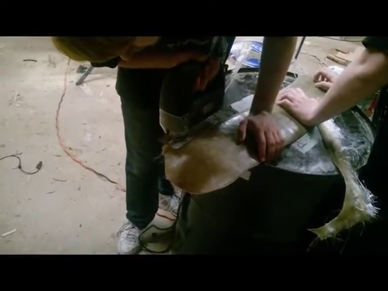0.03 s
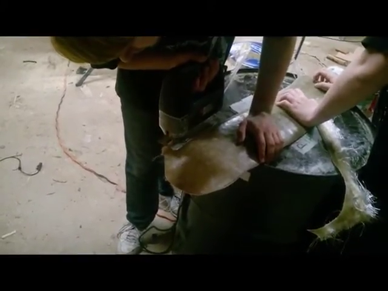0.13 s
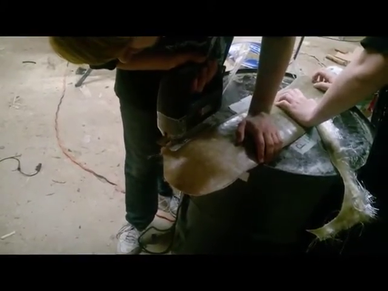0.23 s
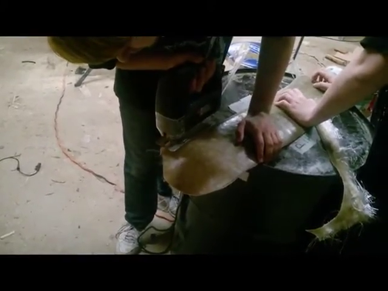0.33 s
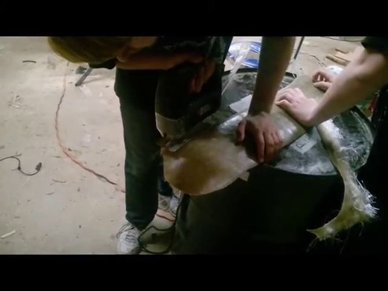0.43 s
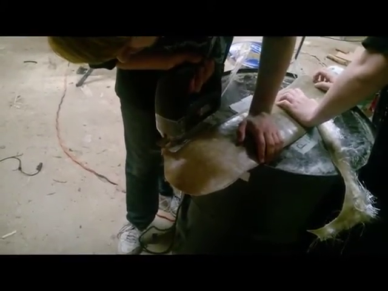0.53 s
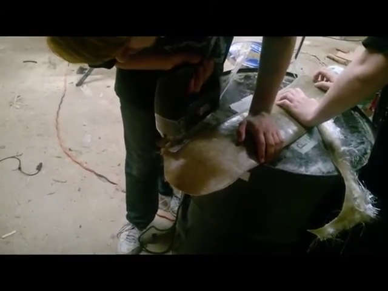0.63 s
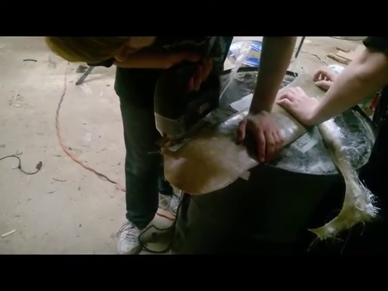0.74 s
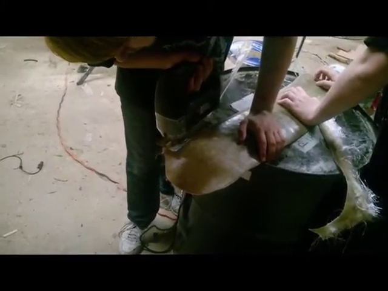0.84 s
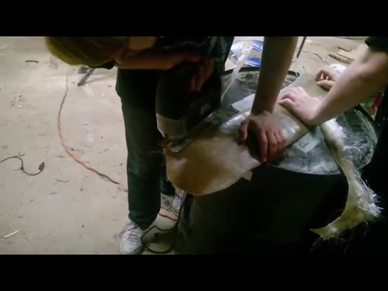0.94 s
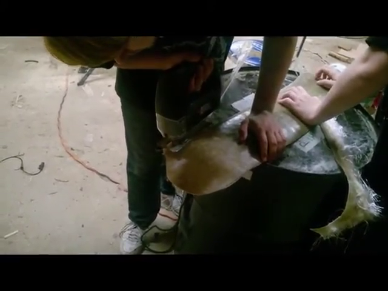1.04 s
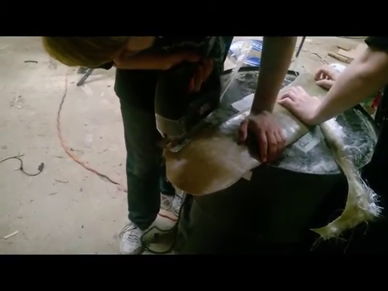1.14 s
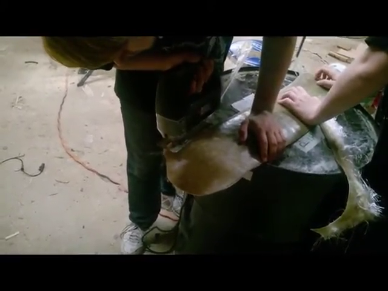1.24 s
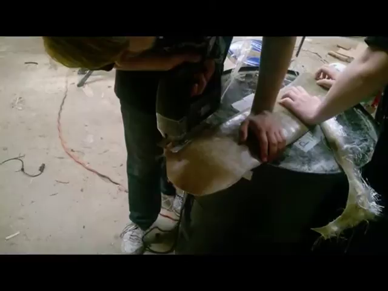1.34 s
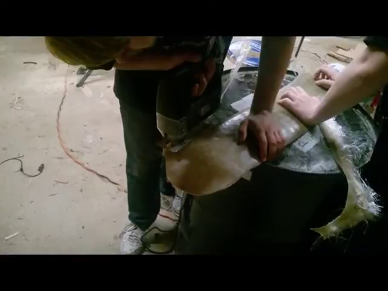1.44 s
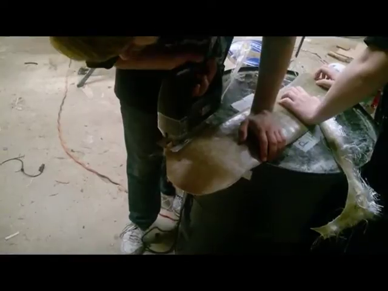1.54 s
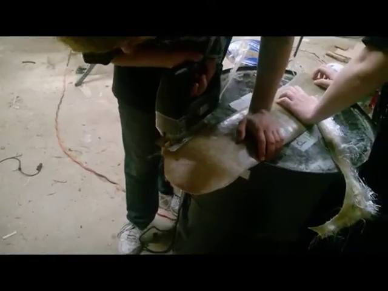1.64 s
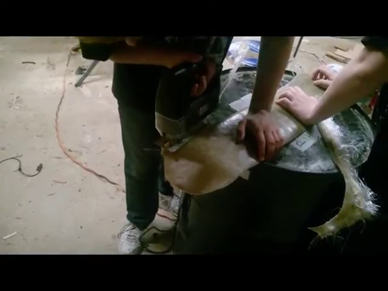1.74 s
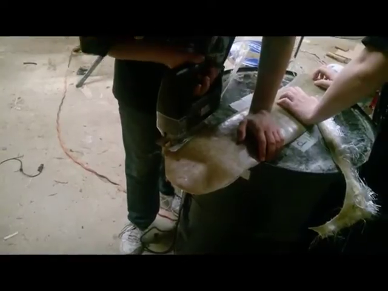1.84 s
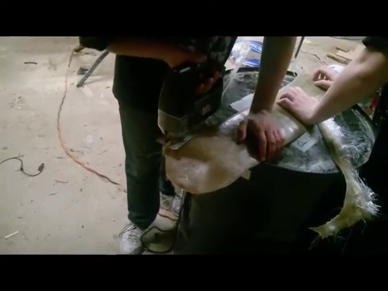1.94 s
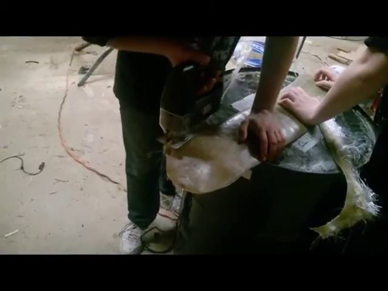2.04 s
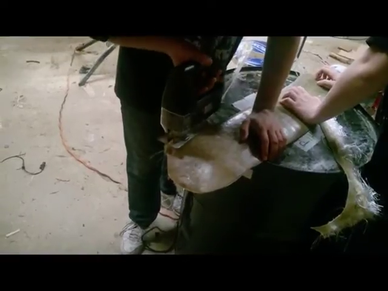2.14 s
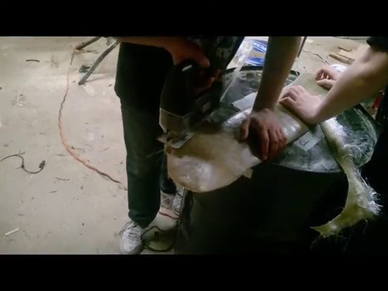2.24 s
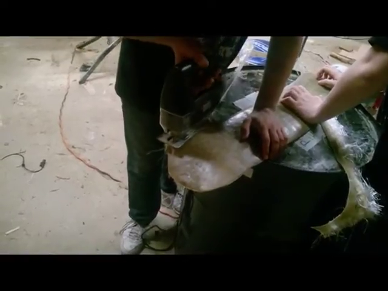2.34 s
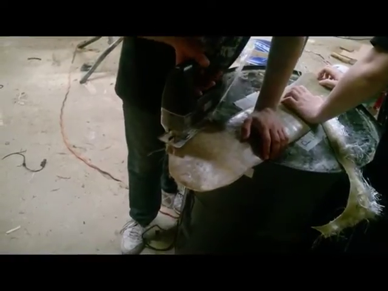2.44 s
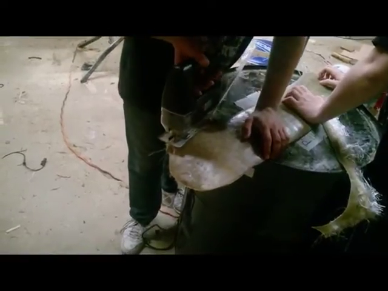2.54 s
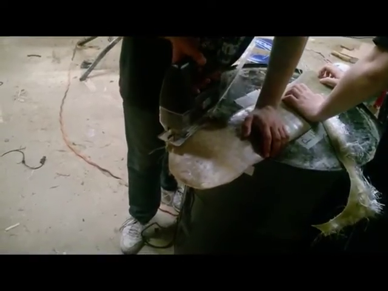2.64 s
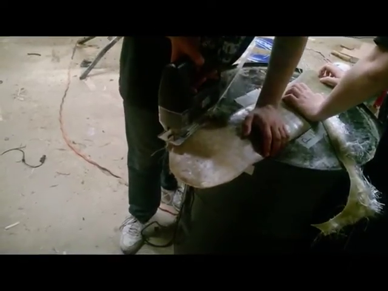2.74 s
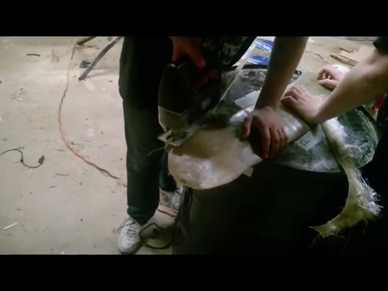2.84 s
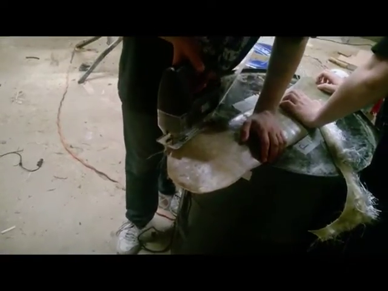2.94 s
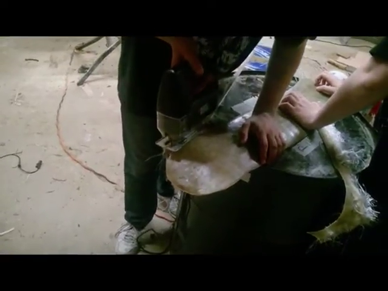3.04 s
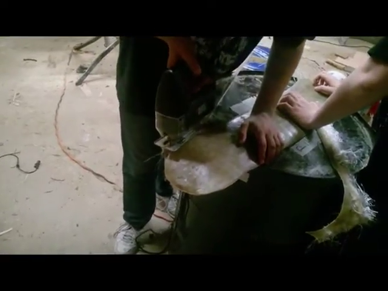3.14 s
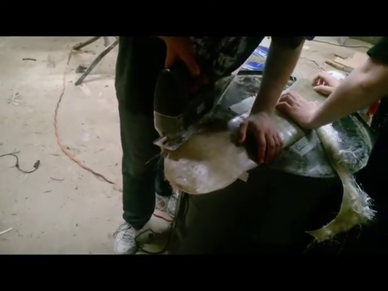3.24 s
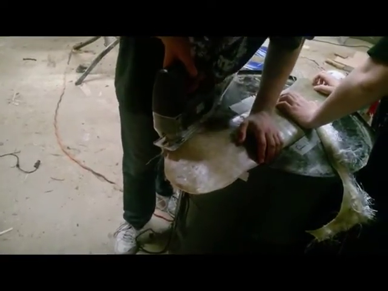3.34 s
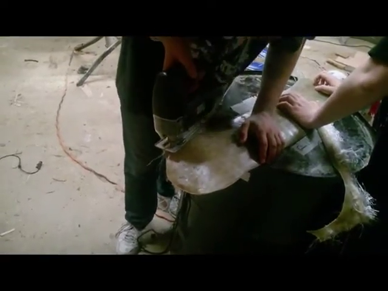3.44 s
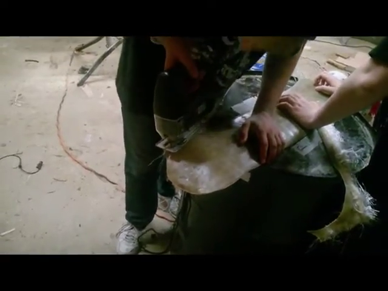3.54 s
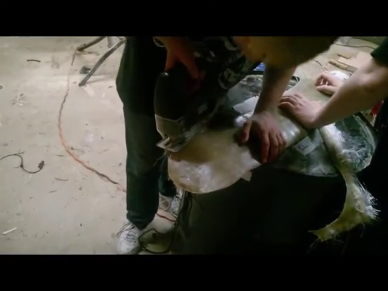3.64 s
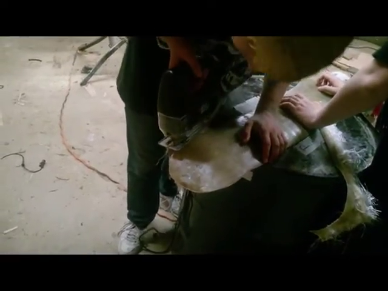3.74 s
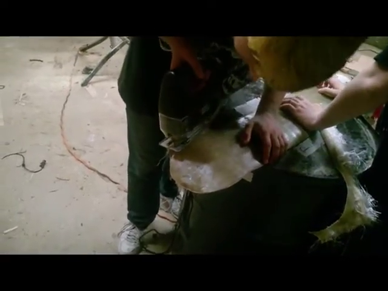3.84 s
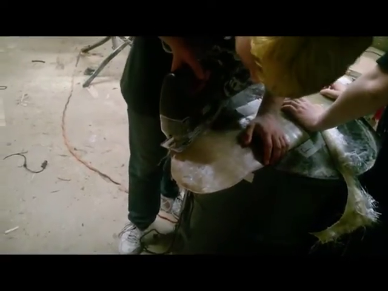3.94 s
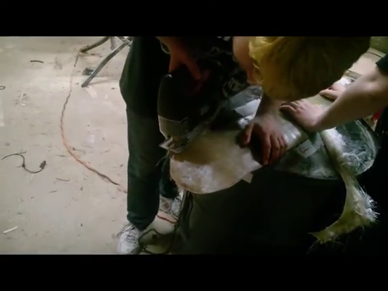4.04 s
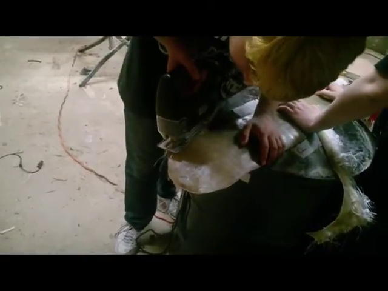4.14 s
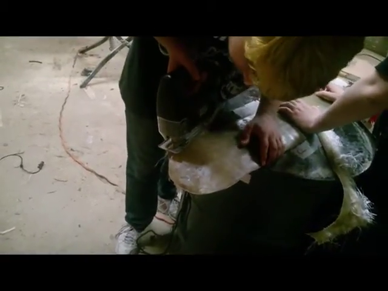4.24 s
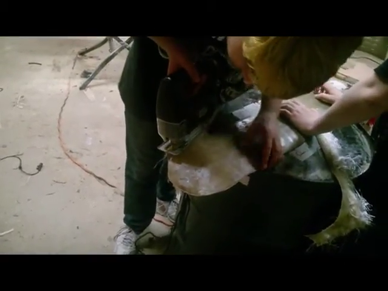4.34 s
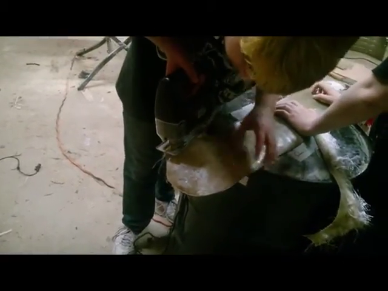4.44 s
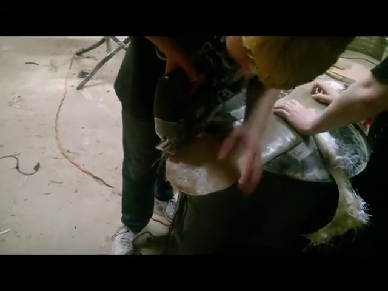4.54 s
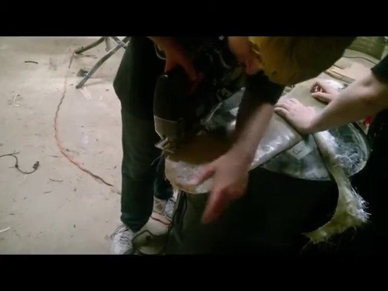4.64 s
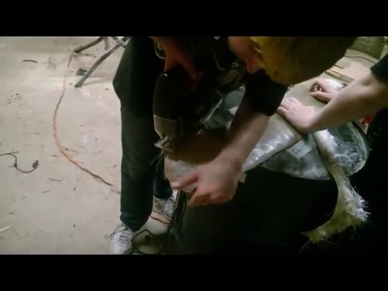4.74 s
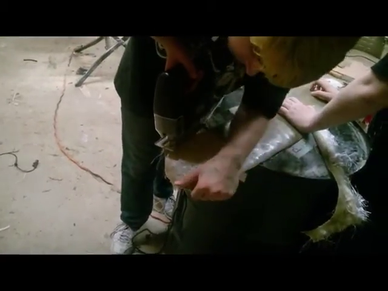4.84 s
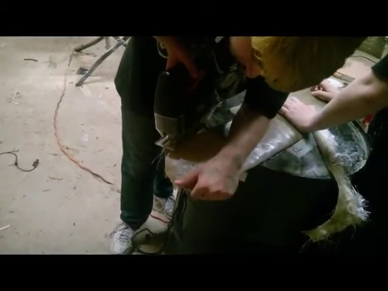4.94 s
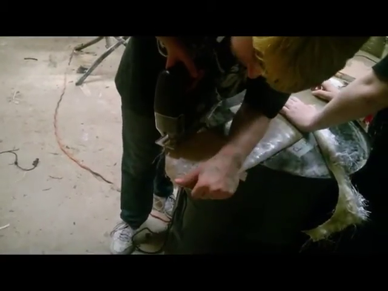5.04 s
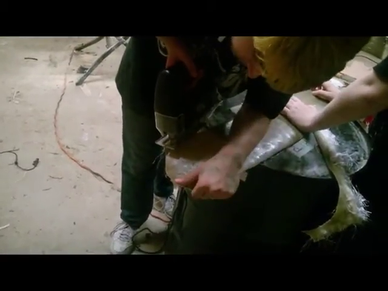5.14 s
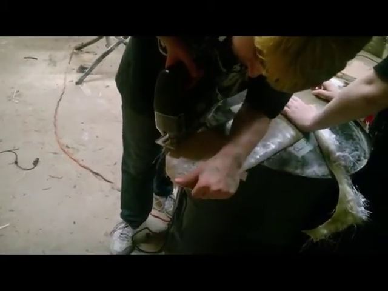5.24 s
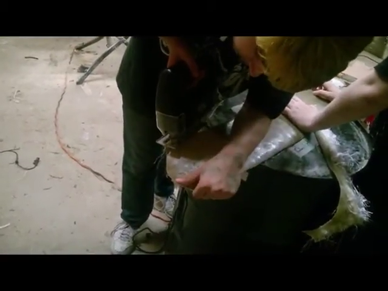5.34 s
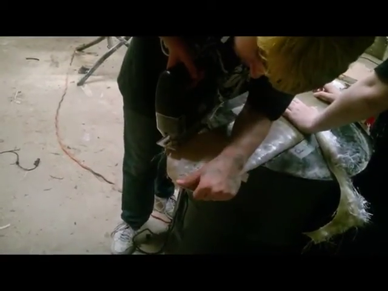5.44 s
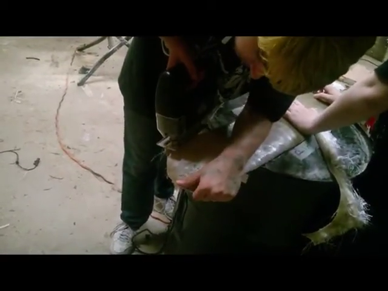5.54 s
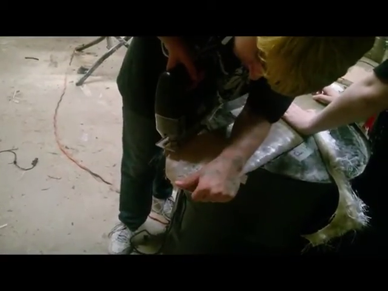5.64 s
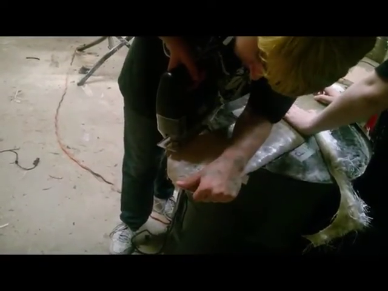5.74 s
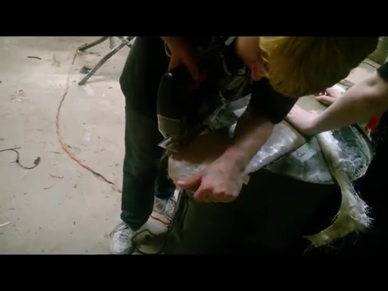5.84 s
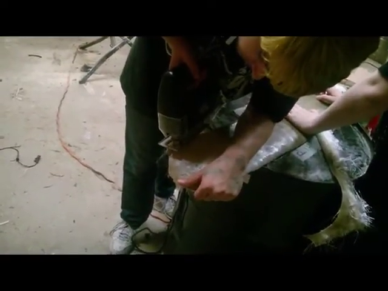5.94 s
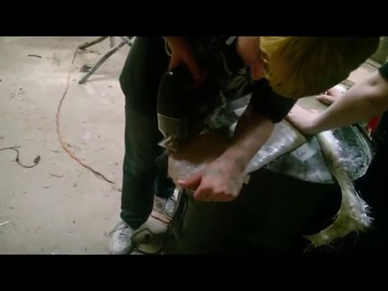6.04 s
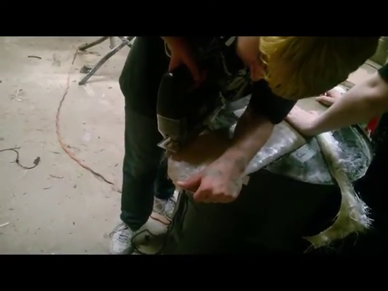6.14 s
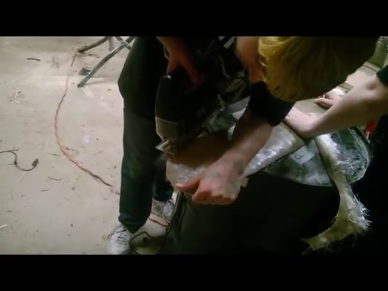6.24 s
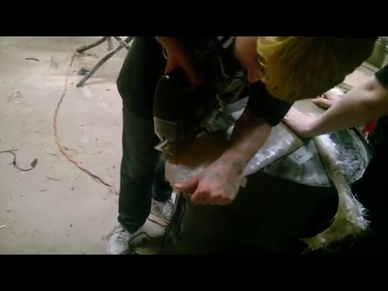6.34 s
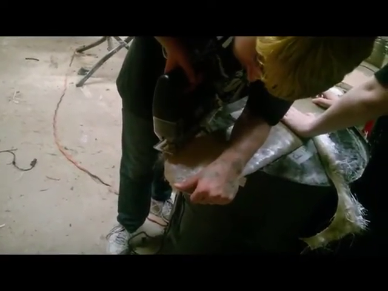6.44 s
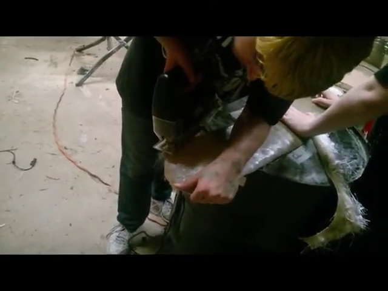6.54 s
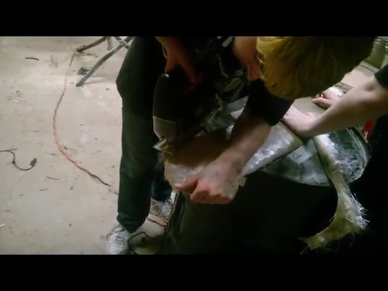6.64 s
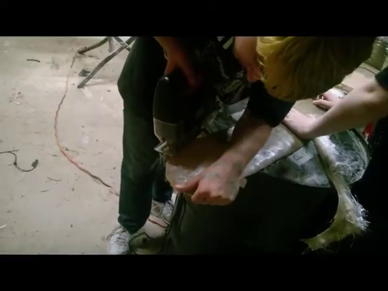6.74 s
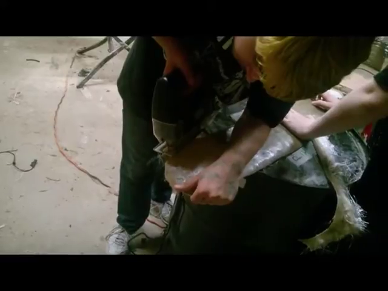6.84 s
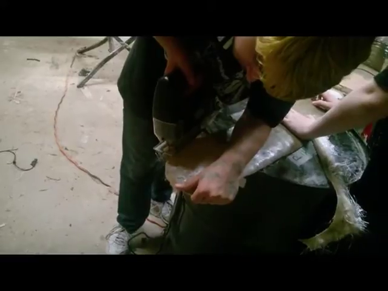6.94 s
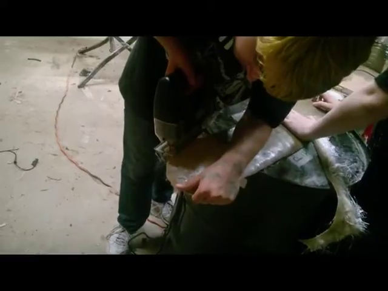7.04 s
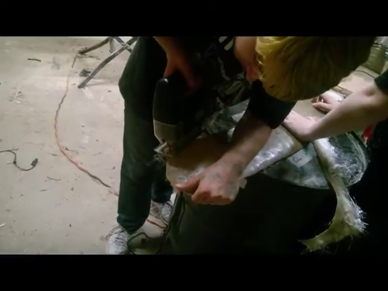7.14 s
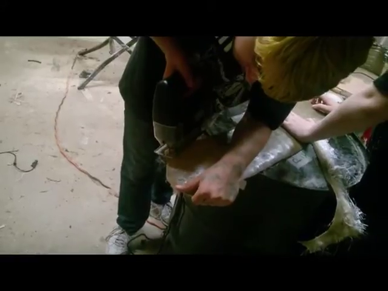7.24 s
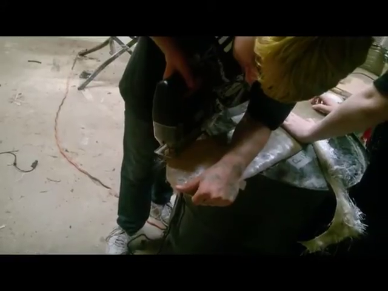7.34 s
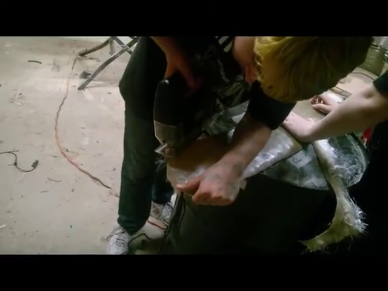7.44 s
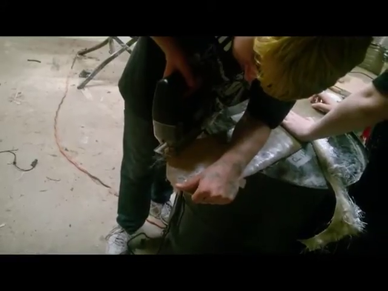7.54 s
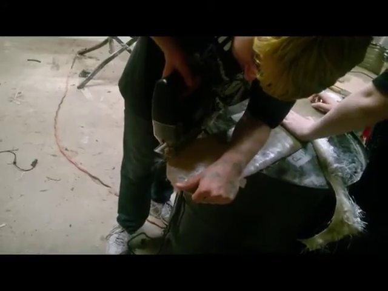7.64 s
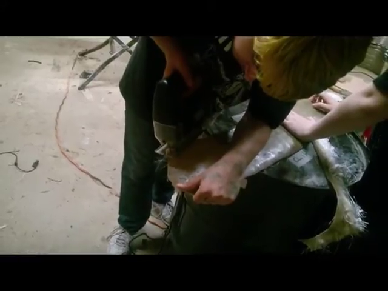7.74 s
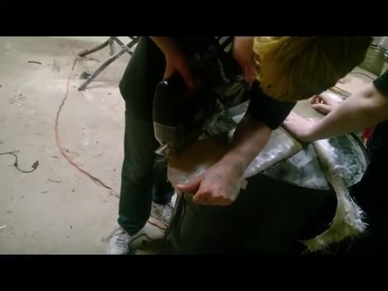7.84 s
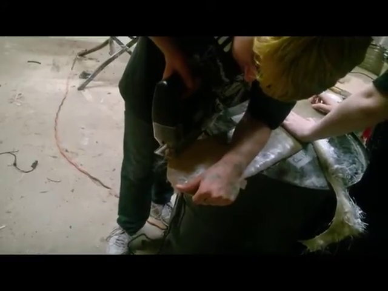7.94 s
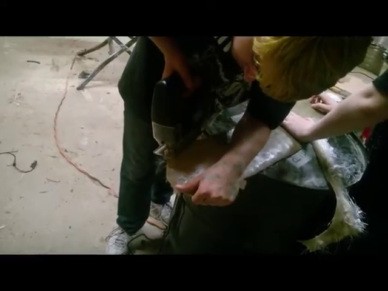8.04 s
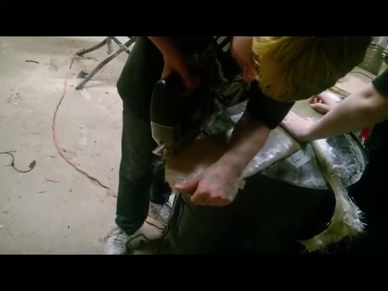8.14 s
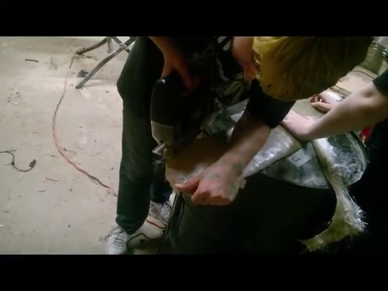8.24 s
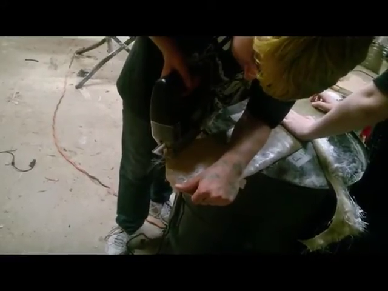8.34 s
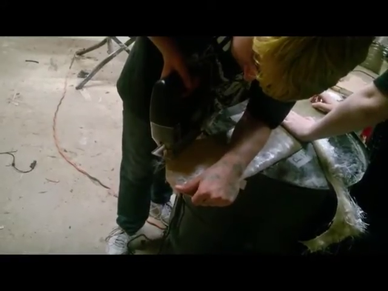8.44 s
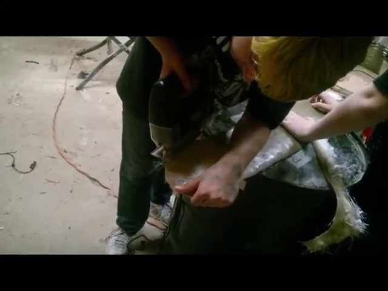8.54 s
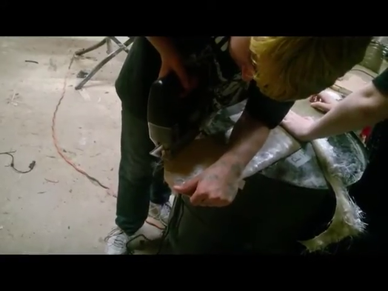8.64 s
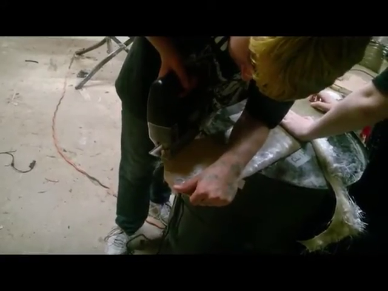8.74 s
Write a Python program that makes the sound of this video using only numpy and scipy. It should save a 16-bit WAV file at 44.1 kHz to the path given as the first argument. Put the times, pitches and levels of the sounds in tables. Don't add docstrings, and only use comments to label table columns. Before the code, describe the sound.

From 0 s a jigsaw is already cutting fibreglass at full speed, close to the microphone: a dense rasping buzz of about fifty-four strokes a second, with ringing board tones, bright motor hiss and low shaking. At about 1.3 s power goes off. The pitch sinks, gear whine glides down, and the buzz separates into hard, rattling knocks, ever slower and weaker through 3.5 s, dragging to a faint low groan and halt near 4.1 s. In the quiet shop a hand scuffs the board at 4.3 s and shifts grip around 4.7 s; something stirs dully at 4.9 s. Faint trigger ticks lead to a click at 5.2 s. The motor spins up quickly, teeth bite with a sharp crack near 5.36 s, and by 6 s the full rasp is back, differently ringing, swelling and easing, with low board thumps around 6.1-6.6 and 7.5 s. It continues cutting to the end, about 8.9 s.

```python
import sys
import numpy as np
from scipy import signal
from scipy.fft import rfft, irfft
from scipy.io import wavfile
from scipy.ndimage import uniform_filter1d

SR = 44100
rng = np.random.default_rng(int(sys.argv[2]) if len(sys.argv) > 2 else 0)


def put_to_file(sound):
    columns = np.atleast_2d(sound).T
    safe = np.clip(columns, -1, 1)
    whole_steps = np.round(safe * 32767)
    wavfile.write(sys.argv[1], SR, whole_steps.astype(np.int16))


def ratio_of_db(decibels):
    return 10 ** (np.asarray(decibels, float) / 20)


N = 387198

FULL_SPEED = 54
POWER_OFF_S, HALT_S, REGRIP_S, POWER_ON_S = 1.27, 4.06, 4.7, 5.24

# frequency in Hz, level in dB.
RASP_COLOUR = [(88, -45), (150, -14.5), (298, -9), (372, -8.5), (405, -12.5), (533, -9), (655, -6),
               (1170, -1.5), (2530, -5.5), (5480, -10), (9000, -24), (11700, -47), (19800, -120)]
# multiple of the stroke rate (rounded when played),
# level in dB against the rasp with the first grip, the same with the second grip.
BOARD_TONES = [(6.255, -42, -33), (6.885, -20.5, -22), (8.94, -34, -23), (9.945, -16, -15.5),
               (14, -10, -16), (15.65, -13.5, -11), (17, -18, -20), (17.6, -18.5, -17), (22.27, -19.5, -11)]


def rasp(turns, speed, level_db, slap_db):
    ratio = speed / FULL_SPEED
    force = stroke_gate(turns, .3, .3, 5.5, 1.2) * stroke_gate(turns, .8, .2, 3.5, 1.2)
    force = force ** ratio * ratio_of_db(0.46 * wander(25))
    rough = rms_one(on_board(teeth(turns, repeat=.22, grain_db=2.5) * force, RASP_COLOUR))
    slap = rms_one(on_board(reversals(turns, .22, spread_db=0.15), RASP_COLOUR))
    first = np.arange(N) < REGRIP_S * SR
    tones = np.zeros(N)
    for k, first_db, second_db in BOARD_TONES:
        strength = ratio_of_db(np.where(first, first_db, second_db) + 2.2 * wander(20))
        tones += strength * np.sin(2 * np.pi * round(k) * turns + k * k)
    fast_only = ratio ** 4 * (ratio_of_db(1.0) * ratio ** 10 * tones + ratio_of_db(slap_db) * slap)
    return ratio_of_db(level_db) * (ratio_of_db(1.0) * rough + fast_only)


# frequency in Hz, width in Hz, boost in dB.
FIRST_GRIP = [(549, 60, 3), (759, 50, 5), (1170, 120, 6), (2030, 200, 3), (2300, 110, 4), (3060, 170, 6)]
# frequency in Hz, width in Hz, boost in dB.
SECOND_GRIP = [(584, 30, 5.8), (876, 62, 4.9), (1060, 540, 4.5), (1405, 37, 4.4), (1874, 78, 6.3),
               (2164, 170, 7.5)]


def on_board(x, spectrum):
    first = np.arange(N) < REGRIP_S * SR
    return colour(x * first, spectrum, FIRST_GRIP) + colour(x * ~first, spectrum, SECOND_GRIP)


def teeth(turns, repeat, grain_db):
    patterns = rng.standard_normal((40, 800))
    at = (turns % 1 * 800).astype(int)
    advance = turns / 12
    row, blend = advance.astype(int), np.pi / 2 * (advance % 1)
    same = patterns[row, at] * np.cos(blend) + patterns[row + 1, at] * np.sin(blend)
    grains = rng.standard_normal(N) * ratio_of_db(grain_db * np.minimum(rng.exponential(1, N), 5))
    return np.sqrt(repeat) * same + np.sqrt(1 - repeat) * rms_one(grains)


# start in seconds, end in seconds, frequency in Hz, width in Hz, level in dB.
RINGING = [(0, .34, 3055, 355, -22.5), (0, .3, 7000, 500, -30.5), (0.416, .74, 3134, 300, -31),
           (.45, 1.199, 1142, 249, -29), (.9, 1.298, 2100, 299, -30.5), (1.151, 1.704, 1197, 201.3, -26.5),
           (1.197, 1.735, 7000, 500, -32.5), (2.4, 3.4, 3190, 250, -50), (5.269, 5.495, 970, 400, -30.5),
           (5.266, 5.44, 2160, 200, -36), (5.957, 6.357, 1120, 200, -26), (6.0, 6.4, 2180, 250, -32),
           (6.724, 7.122, 887, 119, -29.5), (6.724, 7.12, 1180, 200, -27.5),
           (7.986, 8.391, 1363, 160, -24.5), (8.4, 8.9, 1443, 249, -24), (8.2, 8.9, 6600, 700, -28.5)]


def ringing(turns):
    drive = teeth(turns, repeat=.3, grain_db=2.0) * stroke_gate(turns, .25, .17, 13.0, 1.1)
    out = np.zeros(N)
    for start_s, end_s, hz, width_hz, db in RINGING:
        span = slice(int(start_s * SR), int(end_s * SR))
        part = drive[span]
        swell = signal.windows.tukey(len(part), .3)
        out[span] += ratio_of_db(db) * swell * rms_one(band(part, hz - width_hz / 2, hz + width_hz / 2))
    return out


# frequency in Hz, level in dB.
HISS_COLOUR = [(1470, -23), (2500, -17), (3050, -1.5), (3580, -9.5), (4340, -3), (5500, -3), (7760, -13.5),
               (8570, -11.5), (9610, -15), (12700, -18.5), (15600, -26)]
# frequency in Hz, width in Hz, boost in dB.
GEAR_CASE = [(4100, 75, 0.89), (5390, 250, 4.1), (7000, 350, 3.6), (8550, 220, 1.8), (10380, 350, 2)]
# speed in strokes per second, level in dB over the hiss.
WHINE_BY_SPEED = [(12, -34), (23, -24), (25, -16), (27, -9), (29, -18), (34, -11), (41, -8), (47, -11),
                  (51, -14), (53, -22), (54.1, -20), (55, -25)]


def motor(turns, speed, level_db):
    ratio = speed / FULL_SPEED
    brushes = teeth(turns, repeat=0.14, grain_db=3.5) * stroke_gate(turns, 0.12, 0.45, 3.5, 1.5)
    hiss = rms_one(colour(brushes, HISS_COLOUR, GEAR_CASE))
    ping = rms_one(band(reversals(turns, .3, spread_db=1.5), 5250, 5750))
    whine_db = np.interp(speed, *np.transpose(WHINE_BY_SPEED))
    mesh = 2 * np.pi * 51 * turns + .8 * wander(60)
    whine = ratio_of_db(2.5 * wander(25)) * np.sin(3 * mesh)
    whine += ratio_of_db(-1 + 3.5 * wander(30)) * ratio ** 12 * np.sin(2 * mesh)
    return ratio_of_db(level_db - 2.57) * (hiss + ratio_of_db(-7.5) * ratio ** 3 * ping + ratio_of_db(whine_db + 6.5) * whine)


# start in seconds, end in seconds, extra rumble in dB.
WOBBLES = [(0, .25, 7), (1.35, 1.65, 20), (1.86, 2.08, 11.5), (2.45, 2.8, 11.5), (3.28, 3.52, 4.5),
           (5.26, 5.4, 15.5), (6.3, 6.67, 19), (6.67, 7.0, 5), (7.4, 7.58, 8), (8.22, 8.8, 12)]


def shake(turns, speed, rasp_db, still_db):
    ratio = speed / FULL_SPEED
    slack = 1 - ratio
    lines = np.zeros(N)
    for k in range(4):
        strength = ratio_of_db(held(k + 1) + 3.5 + (1.9 + 4.0 * slack) * wander(22))
        lines += strength * np.sin(2 * np.pi * (k + 2) * turns + k * k + 1.5 * slack * wander(15))
    rumble_db = -50.5 + 0.25 * 20 * np.log10(ratio) + spells(WOBBLES, .06) + still_db
    rumble = rms_one(band(rng.standard_normal(N), 72, 150)) * ratio_of_db(1.8 * wander(18))
    growl = rms_one(band(rng.standard_normal(N), 190, 410)) * ratio_of_db(0.83 * wander(25))
    groan = ratio_of_db(-66) * spells([(3.95, 4.2, 1)], 0.18)
    return lines + ratio_of_db(rumble_db - 4) * rumble + (ratio_of_db(rasp_db - 26.5 + 26.6 * slack) + groan) * growl


# start in seconds, then levels in dB of the
HOLDS = [(0, -50, -40, -34, -35), (.15, -44, -31, -41.5, -35), (1.15, -61, -31.5, -33.5, -35),
         (1.4, -78, -49, -36.5, -40), (1.7, -80, -80.5, -77, -85), (5.3, -50, -57, -49, -45),
         (5.75, -54.5, -54, -42.5, -43), (6.06, -36, -45.5, -32, -39), (7.12, -76, -33, -43, -33),
         (7.4, -41.5, -33, -33.5, -60), (7.63, -52, -39.5, -47, -34.5), (8.02, -40.5, -35.5, -36, -43.5)]


def held(column):
    rows = np.array(HOLDS)
    steps = rows[np.searchsorted(rows[1:, 0], np.arange(N) / SR), column]
    return uniform_filter1d(steps, int(.08 * SR))


# frequency in Hz, level in dB.
KNOCK_COLOUR = [(180, -43.5), (300, -20.5), (469, -39.5), (539, -10), (1150, -2), (1300, -8.5),
                (2300, -5.5), (2640, -9), (5380, -18.5), (12000, -36.5), (15600, -76), (22000, -120)]
# time in seconds, change in dB.
CATCHES = [(1.307, -2), (1.346, -6.5), (1.366, -6.5), (1.56, -9), (1.63, -1), (1.68, -1), (1.731, -3),
           (1.759, -2.5), (1.785, 0.5), (1.813, 5.5), (1.842, -1), (1.901, 5), (1.932, -16.5), (1.963, 4.5),
           (1.994, -17.5), (2.025, 2), (2.058, 5.5), (2.195, 6), (2.431, 5.5), (2.475, 2.5), (2.566, 3),
           (2.742, 3), (2.776, 4.5), (2.836, 4.5), (3.047, -3.5), (3.131, 5), (3.232, 2.5), (3.293, 5.5),
           (3.354, 3.5), (3.42, -2)]


def knocks(turns, speed, push_db):
    main, back = (np.flatnonzero(np.diff(np.floor(turns - at)) > 0) for at in (.426, .96))
    back = back[speed[back] < 19.5]
    i = np.r_[main, back]
    extra_db = np.r_[0 * main, 0 * back - 4]
    keep = (i > POWER_OFF_S * SR) & (i < 3.52 * SR)
    i, extra_db = i[keep], extra_db[keep]
    s, ratio = i / SR, speed[i] / FULL_SPEED
    chance = rng.standard_normal((len(i), 2))
    catch_db = sum(db * (np.abs(s - at) < .011) for at, db in CATCHES)
    peak_db = -4.5 + 1.09 * 20 * np.log10(ratio) + 1.8 * push_db[i]
    peak_db = peak_db + extra_db + catch_db + 1.9 * chance[:, 0]
    bright_db = -22.5 - 0.65 * np.maximum(catch_db, 0) + 2.0 * chance[:, 1]
    stretch = ratio ** -0.61
    board = response(KNOCK_COLOUR, FIRST_GRIP)
    dull = bursts(s - .001, peak_db - .5, .002 * stretch, .003 * stretch, board, first_blow=1.2)
    case = response([(2500, -27.5), (4000, 4), (7500, -4.0), (12000, -33)], GEAR_CASE)
    return dull + bursts(s, peak_db + bright_db + 7.0, 0.0027 * stretch, .003 * stretch, case)


# frequency in Hz, width in Hz, boost in dB.
STAND_RINGS = [(65, 14, 28), (165, 14, 24), (212, 14, 37), (270, 14, 31), (312, 18, 18)]


def stand(turns, level_db):
    t = np.arange(N) / SR
    coasting = (t > POWER_OFF_S + .06) * (t < HALT_S)
    jolts = reversals(turns, .43, spread_db=3.0) * coasting * ratio_of_db(level_db)
    body = response([(30, -25.5), (60, 1), (350, -8), (600, -39)], STAND_RINGS)
    return signal.oaconvolve(jolts, body / np.abs(body).max())[:N]


# time in seconds, peak in dB.
BITES = [
    (5.276, -10.5),
    (5.327, -10),
    (5.348, -16),
    (5.36, 3),
    (5.389, -16),
    (5.42, -13),
    (5.447, -21),
]


def bites():
    s, peak_db = np.transpose(BITES)
    body = response(RASP_COLOUR, SECOND_GRIP)
    return bursts(s - .001, peak_db - 3.5, 0.006, 0.0069, body, first_blow=7.8)


# time in seconds, peak in dB.
THUMPS = [
    (6.1, -26),
    (6.387, -23),
    (6.575, -20),
    (6.627, -23),
    (7.454, -28),
]


def thumps():
    s, peak_db = np.transpose(THUMPS)
    body = response([(40, -16.5), (80, -2.5), (200, 11.5), (400, -25), (2000, -73.5)])
    return bursts(s, peak_db + 1.0, 0.005, 0.011, body)


# frequency in Hz, level in dB.
SCUFF_COLOUR = [(200, -8), (310, 2), (600, -11.5), (3000, -10), (6500, -15.5), (12000, -39.5)]
# start in seconds, end in seconds, boost in dB.
SCUFFS = [
    (4.283, 4.365, 23),
    (4.37, 4.46, 5),
    (4.68, 4.76, 8),
    (5.16, 5.3, 5),
]
# start in seconds, end in seconds, boost in dB.
STIRS = [
    (4.05, 4.22, 7),
    (4.31, 4.41, 5),
    (4.858, 4.933, 17),
    (4.927, 4.99, 11),
]
# time in seconds, peak in dB.
TRIGGER = [
    (5.149, -65),
    (5.169, -68),
    (5.219, -49.5),
]
# frequency in Hz, level in dB.
QUIET_COLOUR = [(12, -25), (20, 1), (49, -6.5), (116, -9), (181, -27.5), (650, -28.5), (4970, -40.5),
                (7760, -63), (15600, -52)]


def pause():
    scuff_db, stir_db = -83.5 + spells(SCUFFS, .03), -73.5 + spells(STIRS, .04)
    scuff = ratio_of_db(scuff_db - 0.5) * rms_one(colour(rng.standard_normal(N), SCUFF_COLOUR))
    stir = ratio_of_db(stir_db - 3.5) * rms_one(band(rng.standard_normal(N), 40, 110))
    s, peak_db = np.transpose(TRIGGER)
    ticks = bursts(s, peak_db, .0002, 0.0022, response([(300, -20.5), (900, 4.5), (6000, -12), (10000, -26)]))
    quiet = ratio_of_db(-68.5) * rms_one(colour(rng.standard_normal(N), QUIET_COLOUR))
    return scuff + stir + ticks + quiet


def shop(x):
    t = np.arange(SR) / SR
    fade = ratio_of_db(-60 * t / .55)
    tail = band(rng.standard_normal(SR), 110, 5400) * fade * (t > .008)
    return ratio_of_db(-14.5) * signal.oaconvolve(x, tail / np.sqrt(np.sum(tail ** 2)))[:N]


# time in seconds, speed in strokes per second.
FIRST_RUN = [(0, 54.16), (1.228, 53.789), (1.552, 43.898), (1.806, 35.308), (2.209, 27.461),
             (2.592, 20.294), (2.962, 13.976), (3.267, 8.507), (3.5, 7.395), (3.76, 4.5), (3.83, 2),
             (4.05, 1)]
# time in seconds, speed in strokes per second.
SECOND_RUN = [(6.5, 53.65), (6.65, 53.2), (6.8, 53.9), (7.25, 54.25), (7.45, 54.9), (8.0, 55.1),
              (8.3, 54.4), (8.78, 54.2)]


def crank_speed():
    t = np.arange(N) / SR
    gap = 41.7 * np.exp(-np.maximum(t - POWER_ON_S, 0) / .22)
    rising = np.interp(t, *np.transpose(SECOND_RUN)) - gap
    return np.where(t < POWER_ON_S, np.interp(t, *np.transpose(FIRST_RUN)), rising)


# start in seconds, end in seconds, change in dB.
PUSH = [(1.0, 1.6, 1.5), (2.07, 2.19, -3.5), (2.21, 2.41, -8), (2.6, 2.73, -2.5), (3.52, 3.6, -5.5),
        (3.61, 3.74, 0), (3.78, 4.1, -5.5), (5.2, 5.48, -3), (5.48, 5.86, -6), (5.86, 6.06, -2),
        (6.08, 6.2, 0.5), (6.85, 7.1, 0), (7.13, 7.4, -6), (7.62, 8.01, -6.5), (8.45, 8.55, -3.5),
        (8.6, 8.9, -0.5)]


def hand_push():
    return spells(PUSH, .074)


def stroke_gate(turns, at, width, depth_db, spread_db):
    stroke = (turns - at + .5).astype(int) + 1
    strength_db = depth_db + spread_db * rng.standard_normal(int(turns[-1]) + 2)[stroke]
    bump = np.exp((np.cos(2 * np.pi * (turns - at)) - 1) / width)
    return ratio_of_db(strength_db * bump)


def reversals(turns, at, spread_db):
    hits = np.flatnonzero(np.diff(np.floor(turns - at + .012 * wander(50))) > 0)
    blows = np.zeros(N)
    blows[hits] = ratio_of_db(spread_db * rng.standard_normal(len(hits)))
    return blows


def bursts(times, peaks_db, rise_s, fall_s, body, first_blow=0):
    t, out = np.arange(4000) / SR, np.zeros(N + 4000)
    rise = 1 - np.exp(-t / np.reshape(rise_s, (-1, 1)))
    fall = np.exp(-t / np.reshape(fall_s, (-1, 1)))
    contacts = rise * fall * rng.standard_normal((len(times), len(t)))
    contacts[:, 60] += first_blow
    rows = signal.oaconvolve(contacts, body[None], axes=1)[:, :len(t)]
    for s, peak_db, row in zip(times, peaks_db, rows):
        out[int(s * SR):int(s * SR) + len(t)] += ratio_of_db(peak_db) * row / np.abs(row).max()
    return out[:N]


def spells(rows, edge_s):
    t = np.arange(N) / SR
    steps = sum(db * ((t >= start_s) & (t < end_s)) for start_s, end_s, db in rows)
    return uniform_filter1d(steps, max(int(edge_s * SR), 1))


def wander(rate):
    knots = rng.standard_normal(int(N / SR * rate) + 2)
    return np.interp(np.arange(N) / SR * rate, np.arange(len(knots)), knots) * 1.2


def rms_one(x):
    return x / np.sqrt(np.mean(x ** 2) + 1e-20)


def band(x, low_hz, high_hz):
    return signal.sosfilt(signal.butter(2, [low_hz, high_hz], "band", fs=SR, output="sos"), x)


def colour(x, spectrum, peaks=()):
    return signal.oaconvolve(x, response(spectrum, peaks))[:N]


def response(spectrum, peaks=()):
    size = 4096
    hz = np.maximum(np.arange(size // 2 + 1) * SR / size, 1)
    table_hz, table_db = np.transpose(spectrum)
    level_db = np.interp(np.log(hz), np.log(table_hz), table_db)
    for centre_hz, width_hz, boost_db in peaks:
        level_db = level_db + boost_db / (1 + (2 * (hz - centre_hz) / width_hz) ** 2)
    cepstrum = irfft(level_db * np.log(10) / 20)
    cepstrum[1:size // 2] *= 2
    cepstrum[size // 2 + 1:] = 0
    return irfft(np.exp(rfft(cepstrum)))


def scene():
    t, speed = np.arange(N) / SR, crank_speed()
    turns = np.cumsum(speed) / SR
    blade = turns + .73
    speed_db, push_db = 20 * np.log10(speed / FULL_SPEED), hand_push()
    still_s = [HALT_S - .04, HALT_S + .04, POWER_ON_S - .002, POWER_ON_S + .006, POWER_ON_S + .03]
    still_db = np.interp(t, still_s, [0, -30, -45, -14, 0])
    drag_db = 5 * (1 - speed / FULL_SPEED) ** 3 * np.cos(2 * np.pi * (turns - 0.45))
    rasp_db = -19 + 1.3 * speed_db + push_db + drag_db + still_db
    slap_db = -8.5 + .9 * push_db + spells([(POWER_OFF_S, POWER_ON_S, -20)], .04)
    hiss_db = -22.5 + 1.72 * speed_db + .15 * push_db + 0.73 * (t > REGRIP_S) + still_db
    saw = rasp(blade, speed, rasp_db, slap_db) + ringing(blade) + motor(blade, speed, hiss_db)
    low = shake(turns, speed, rasp_db, still_db) + stand(turns, -32.5 + .6 * speed_db + .6 * push_db)
    hits = knocks(turns, speed, push_db) + bites() + thumps()
    return (saw + low + hits + shop(hits) + pause())[None]


def top_cut(x):
    return signal.sosfilt(signal.butter(12, 15720, fs=SR, output="sos"), x)


def record(dry):
    mix = 1.114 * np.tanh(dry / 1.43)
    return top_cut(mix)


dry = scene()
out = record(dry)
put_to_file(out)
```